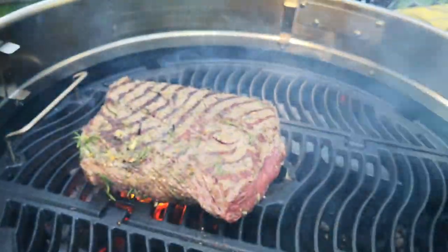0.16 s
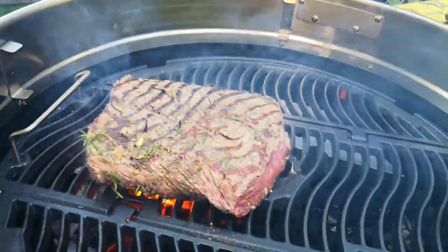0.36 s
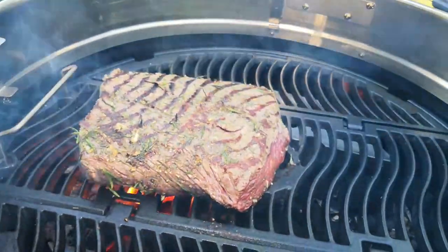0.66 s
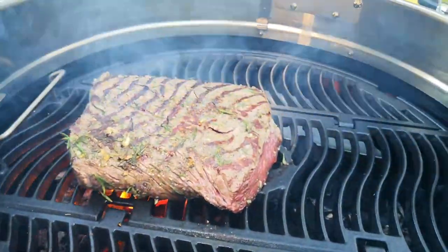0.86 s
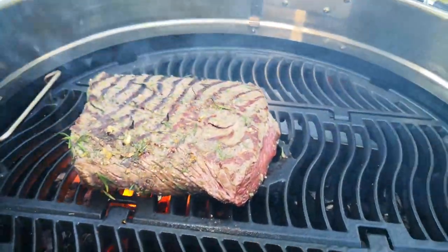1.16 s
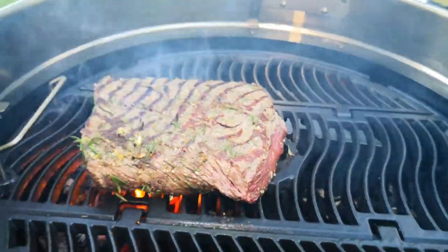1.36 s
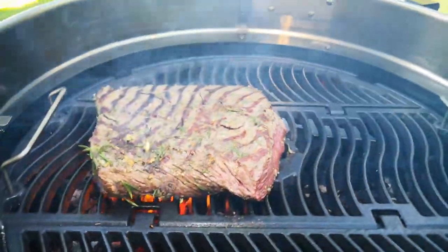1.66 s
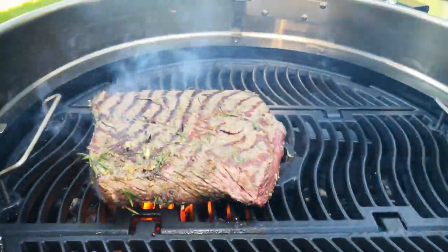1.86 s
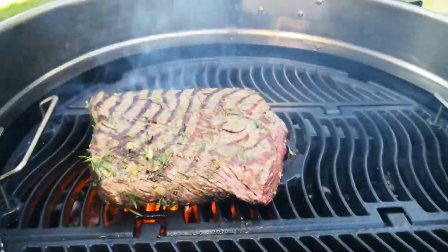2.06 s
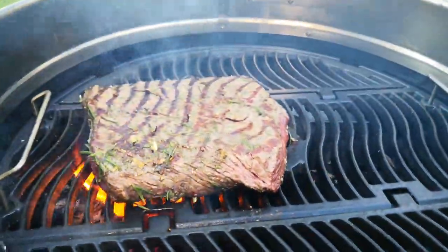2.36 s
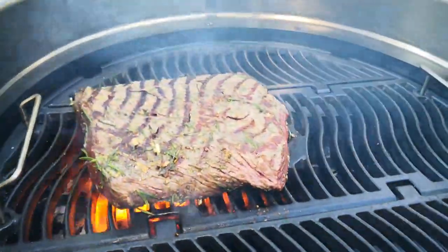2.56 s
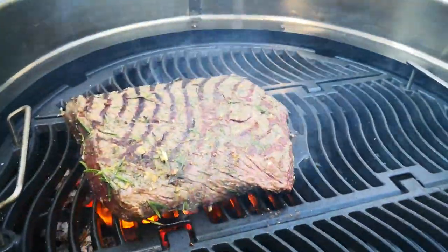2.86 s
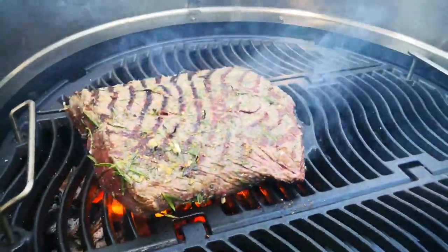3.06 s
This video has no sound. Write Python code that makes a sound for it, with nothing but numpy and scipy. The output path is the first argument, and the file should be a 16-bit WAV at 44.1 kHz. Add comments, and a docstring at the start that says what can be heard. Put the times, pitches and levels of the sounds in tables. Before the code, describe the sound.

Meat sizzles steadily on a hot charcoal grill, fat crackling and spitting, heard close outdoors.

```python
"""Outdoors, close to a charcoal kettle grill, a joint of meat sizzles, heard by two microphones.
Fat fizzes as banded noise under random bursts, and snaps and spits on the bars as short clicks of noise.
Heavier spits ring the steel bowl's air resonances; flames flap below as low noise and short low pulses.
A small bird chirps some way off in gliding sine tones."""
import sys
import numpy as np
from scipy import signal
from scipy.io import wavfile

SR = 44100
rng = np.random.default_rng(int(sys.argv[2]) if len(sys.argv) > 2 else 0)


def store_wav(level_fs):
    """Save 16-bit WAV to argv[1]."""
    pcm = np.round(np.clip(np.atleast_2d(level_fs), -1, 1) * 32767)
    wavfile.write(sys.argv[1], SR, pcm.T.astype(np.int16))


N = 141120  # 3.2 s

# Course of the steady sounds. Each row: time in seconds, then relative levels in dB of the sizzle,
# its lower body and the flames.
LEVEL_COURSE = [(0, -20.5, -30.5, -35), (.25, -22, -31, -37.5), (1.08, -19.5, -33, -36.5),
                (1.14, -23, -36, -41), (1.27, -26, -34.5, -35.5), (1.3, -28.5, -40.5, -46),
                (1.62, -23, -35, -36.5), (2.1, -22.5, -34, -37), (2.3, -21, -33, -42.5),
                (2.55, -22, -34.5, -33), (2.7, -20, -29.5, -29), (2.88, -23.5, -33.5, -34),
                (3.2, -22, -31.5, -34.5)]
# Large bubbles bursting. Each row: start in seconds, relative level in dB, share of low noise in dB.
SNAPS = [(0.01, -5.5, -38), (0.2436, -13, 0), (0.4618, -12, -4), (0.7963, -4, -9.5), (1.108, 4, -40),
         (1.1356, -8.5, -7), (1.2047, -3, -8), (1.2649, -14.5, 6), (1.363, -4, -40), (1.72, -7.5, -19),
         (1.7442, -3.5, -29), (2.3417, -5.5, -11), (2.5082, -6, -8), (2.8792, -6.5, -25),
         (3.1696, -10.5, -0.5)]
# Heavy spits striking the bowl. Each row: start in seconds, relative level in dB.
SPITS = [(0.06, -18), (0.226, -19), (0.246, -22), (0.277, -19.5), (0.515, -19), (0.606, -20.5),
         (1.015, -21), (1.147, -20.5), (1.192, -19.5), (1.257, -24.5), (2.02, -21), (2.061, -19),
         (2.288, -20), (2.359, -16.5), (2.645, -21), (2.667, -19), (2.699, -28), (2.732, -20), (2.752, -21),
         (2.779, -20.5), (2.943, -19), (2.958, -19.5), (2.977, -23.5), (3.104, -21.5)]
# Low thumps of flapping flames or moving air. Each row: centre in seconds, envelope peak in dB, pitch in Hz.
PUFFS = [(0.064, -21, 192), (.218, -24, 218), (0.353, -17.5, 45.6), (0.677, -14, 69.5), (0.727, -9, 93.5),
         (0.951, -20.5, 197), (1.2, -18, 220), (1.494, -25.5, 72.6), (1.679, -17, 77), (1.737, -18, 60.5),
         (1.786, -18, 97), (1.894, -18.5, 65), (1.981, -24.5, 81), (2.063, -22.5, 80), (2.613, -16, 69.6),
         (2.648, -12.5, 137), (2.673, -11, 58.3), (2.764, -9, 93), (2.774, -15, 186), (2.994, -16, 64),
         (3.039, -5.5, 56), (3.055, -6.5, 75)]
# Bird notes. Each row: start in seconds, length in seconds, first pitch in Hz, last pitch in Hz,
# bend (1 is straight, more slides early then holds), level in dB about which the note wavers.
CHIRPS = [(.002, .034, 2600, 2545, 1, -30), (.150, .048, 2400, 2680, 1, -32),
          (.271, .058, 3560, 3150, 6, -23.5), (.379, .068, 3330, 2790, 2.8, -27),
          (.904, .032, 2980, 2860, 3, -32), (.932, .018, 2870, 3260, 1, -32),
          (.947, .026, 3220, 3100, 2, -29), (.972, .042, 3080, 2560, 1.2, -30.5),
          (1.222, .032, 2800, 2510, 1, -35)]
# Response of each microphone to the sizzle. Each row: frequency in Hz, gain in dB.
LEFT_RESPONSE = [(250, -24.5), (450, -40.5), (1000, -22), (1700, -15.5), (2100, -14.5), (2500, -10.5),
                 (3800, -9.5), (5600, -4.5), (7200, 3.5), (7900, -3), (8300, -10.5), (10000, -22.5),
                 (10500, -16), (15000, -15.5)]
RIGHT_RESPONSE = [(250, -19.5), (450, -25.5), (1000, -27.5), (1700, -10), (2100, -10.5), (3700, -7.5),
                  (4300, -15.5), (5000, -9.5), (6000, -9), (7900, 1.5), (8400, -10), (10100, -16),
                  (10600, -14.5), (15000, -15.5)]
# Resonances of the air in the bowl. Each row: frequency in Hz, bandwidth in Hz,
# relative left level in dB, relative right level in dB.
BOWL_MODES = [(542, 81, -16, -10.5), (801, 25, -11.5, -3.5), (1101, 108, -7, -64), (1292, 96, -8.5, -9.5),
              (1702, 202, -6.5, -7), (2560, 440, -14.5, -16.5)]
# Spectrum of the flame rumble. Each row: frequency in Hz, relative density in dB per Hz.
FLAME_SPECTRUM = [(12, -22), (20, 3.5), (60, 2), (97, -3.5), (193, -3), (230, -7.5), (400, -27.5),
                  (520, -60)]
# Bubble sizes, large to small. Each row: low edge in Hz, high edge in Hz, bursts per second, spread in dB,
# decay by 60 dB in seconds, own-burst level in dB, shared-burst level in dB, column of LEVEL_COURSE.
FIZZ_BANDS = [(202, 1580, 97, 0.67, 0.029, 4, -24, 2),
              (1320, 2880, 54, 6.5, 0.0042, -7, -2.5, 2),
              (2650, 5960, 140, 3, 0.071, 3.5, -1, 1),
              (4940, 8800, 470, 2.2, 0.0065, -11.5, -4.5, 1),
              (8740, 19400, 400, 8.4, 0.0018, -5.5, -3.5, 1)]

SPIT_RISE_S, SPIT_T60_S = .0012, .014
BOWL_LAG_S = .0006  # the bowl reaches the right microphone later
FLAP_DB = 2.  # rms swing of the flames
PUFF_CYCLES, PUFF_MIN_S = .3, .0035
ROLL_DB, ROLL_S = -15, .03  # level relative to its puff, and Gaussian width
CHIRP_SKEW = 1.35  # above 1 the swell peaks past the middle of the note
WAVER_DB = 2.5  # rms swing of the chirps
EDGE_HZ = 15200


def amp(db):
    """Decibel law: 20 dB is a factor of ten in amplitude."""
    return 10 ** (np.asarray(db) / 20)


def even(x):
    """Normalisation to unit root mean square."""
    return x / np.sqrt(np.mean(x ** 2) + 1e-20)


def add(mix, s, sound):
    """Superposition: a sound is summed into the mix from s seconds on."""
    part = mix[..., round(s * SR):][..., :sound.shape[-1]]
    part += sound[..., :part.shape[-1]]


def band(x, lo_hz, hi_hz):
    """Band-pass filtering with a maximally flat passband."""
    return signal.sosfilt(signal.butter(2, [lo_hz, hi_hz], "band", fs=SR, output="sos"), x)


def colour(x, points):
    """Minimum-phase filtering: the phase follows from the log gain drawn through (Hz, dB) points."""
    point_hz, point_db = np.transpose(points)
    bin_hz = abs(np.fft.fftfreq(4096, 1 / SR))
    gain_db = np.interp(np.log(bin_hz + 1), np.log(point_hz), point_db)
    log_gain = gain_db * np.log(10) / 20
    phase = -signal.hilbert(log_gain).imag
    taps = np.fft.ifft(np.exp(log_gain + 1j * phase)).real[:2048]
    return signal.oaconvolve(x, taps)[:N]


def drift(rate_hz):
    """Random fluctuation of rms 1: sines of random phase up to rate_hz, the slower ones stronger."""
    t = np.arange(N) / SR
    rates = np.geomspace(rate_hz / 12, rate_hz, 24)
    return even(sum(np.sin(2 * np.pi * (f * t + rng.random())) / np.sqrt(f) for f in rates))


def bursts(per_s, spread_db, t60):
    """Shot process: sudden random bursts, a few large, decay exponentially and add in power."""
    size_db = spread_db * np.minimum(rng.exponential(1, N), 3.2)
    size = amp(size_db) * (rng.random(N) < per_s / SR)
    t = np.arange(1500) / SR
    power_decay = amp(-120 * t / t60)
    return np.sqrt(abs(signal.oaconvolve(size ** 2, power_decay)[:N]))


def level(column):
    """Amplitude course of a steady sound, interpolated linearly in dB."""
    rows = np.transpose(LEVEL_COURSE)
    return amp(np.interp(np.arange(N) / SR, rows[0], rows[column]))


def fizz():
    """Modulated noise: steam hiss and bursting bubbles; small bubbles are bright, large ones dull."""
    out = np.zeros((2, N))
    shared = even(bursts(160, 6.5, 0.026))
    for lo_hz, hi_hz, per_s, spread_db, t60, own_db, shared_db, column in FIZZ_BANDS:
        own = even(bursts(per_s, spread_db, t60))
        # the constant 1 is the steady hiss
        env = even(np.sqrt(1 + (amp(own_db) * own) ** 2 + (amp(shared_db) * shared) ** 2))
        course = level(column)
        env = env * amp(1.18 * drift(25.01)) * course / course.mean()
        out += band(env * rng.standard_normal((2, N)), lo_hz, hi_hz)
    return amp(-13.0) * out


def bowl():
    """Forced resonance: heavy spits, a patter of lighter ones and the fire's hiss excite the bowl's air."""
    spray, blows = np.zeros(N), np.zeros(N)
    t = np.arange(1200) / SR
    decay = amp(-60 * t / SPIT_T60_S) + amp(-11.5 - 60 * t / 0.066)
    shape = np.minimum(t / SPIT_RISE_S, 1) * decay
    for s, db in SPITS:
        add(spray, s, amp(db + 10.5) * shape)
        add(blows, s + SPIT_RISE_S, amp([db + 22.5]))  # one-sample impulse
    patter = even(np.sqrt(0.73 + even(bursts(58, 3.0, 0.11)) ** 2))
    env = spray + amp(6.5) * level(2) * patter

    common, left, right = rng.standard_normal((3, N))
    separate = env * np.array([left, right])
    both = env * common + blows
    both = np.array([both, np.roll(both, round(BOWL_LAG_S * SR))])
    drive = both + 0.74 * separate

    # the noise and the blow heard directly, without resonance
    responses = (LEFT_RESPONSE, RIGHT_RESPONSE)
    direct = [colour(band(v, 250, 3000), response) for v, response in zip(separate, responses)]
    out = amp(7.5) * np.array(direct)
    out += amp(1) * band(blows, 500, 1600)
    for hz, width_hz, left_db, right_db in BOWL_MODES:
        ring = signal.lfilter(*signal.iirpeak(hz, hz / width_hz, SR), drive)
        out += amp(7.5 + np.array([[left_db], [right_db]])) * ring
    return out


def flames():
    """Low-frequency noise: a flapping rumble, and short low puffs of flapping flames or moving air."""
    # mostly common noise keeps the two microphones nearly alike
    common, left, right = rng.standard_normal((3, N))
    rumble = np.array([colour(common + 0.16 * v + 0.22 * band(v, 96, 880), FLAME_SPECTRUM)
                       for v in (left, right)])
    out = even(rumble) * amp(FLAP_DB * drift(23)) * level(3)

    # deep puffs lie inside a longer roll
    clock = np.arange(N) / SR
    swells = [amp(db + ROLL_DB) * np.exp(-.5 * ((clock - s) / ROLL_S) ** 2)
              for s, db, hz in PUFFS if hz < 140]
    out += np.max(swells, axis=0) * even(band(rng.standard_normal(N), 29.6, 94.8))

    t = np.arange(-1400, 1400) / SR
    for (s, db, hz), (turn, lean) in zip(PUFFS, rng.random((len(PUFFS), 2))):
        width_s = PUFF_MIN_S + PUFF_CYCLES / hz * .5
        # the right channel is shifted by up to 1.7 ms either way
        shift = np.array([[0], [hz * 0.0034 * (lean - .5)]])
        puff = np.exp(-.5 * (t / width_s) ** 2) * np.cos(2 * np.pi * (hz * t + turn + shift))
        add(out, s + t[0], amp(db) * (puff - puff.mean(1, keepdims=True)))
    return out


def bird():
    """Frequency modulation: near-pure notes slide to their pitch and swell, wavering in the hot air."""
    out = np.zeros(N)
    for s, length, first_hz, last_hz, bend, db in CHIRPS:
        u = np.arange(0, length, 1 / SR) / length  # fraction of the note
        hz = last_hz + (first_hz - last_hz) * (1 - u) ** bend
        swell = np.sqrt(abs(np.sin(np.pi * u ** CHIRP_SKEW)))
        tone = np.sin(2 * np.pi * np.cumsum(hz) / SR)
        add(out, s, amp(db) * swell * tone)
    return out * amp(WAVER_DB * np.array([drift(140), drift(127.8)]))


def snaps():
    """Impulsive radiation: each large bubble is a click with a few milliseconds of spray."""
    out = np.zeros((2, N))
    t = np.arange(900) / SR
    decay = amp(-60 * t / 0.0073) + amp(-15.0 - 60 * t / 0.041)
    shape = np.minimum(t / 0.00098, 1) * decay
    for s, db, low_db in SNAPS:
        spray = rng.standard_normal((2, len(t))) * shape
        body = band(spray, 4130, 9450)
        low = amp(low_db + 11) * band(spray, 510, 5800)
        high = amp(-3) * band(spray, 10800, 16300)
        add(out, s, amp(db + 9.0) * (body + low + high))
    return out


def scene():
    """Superposition of all sources, the fat coloured by each microphone's response."""
    fat = fizz() + snaps()
    fat = np.array([colour(fat[0], LEFT_RESPONSE), colour(fat[1], RIGHT_RESPONSE)])
    return fat + bowl() + flames() + bird()


def record(dry):
    """Band limitation: a linear-phase low-pass filter removes what lies above EDGE_HZ."""
    taps = signal.firwin(401, EDGE_HZ, window=("kaiser", 9), fs=SR)
    return signal.oaconvolve(dry, taps[None], "same")


dry = scene()
out = record(dry)
store_wav(out)
```